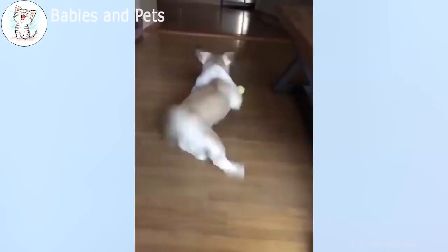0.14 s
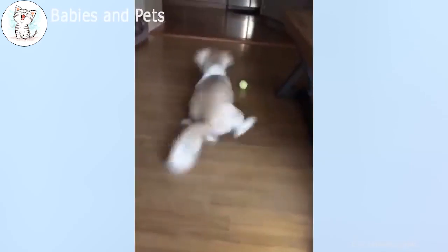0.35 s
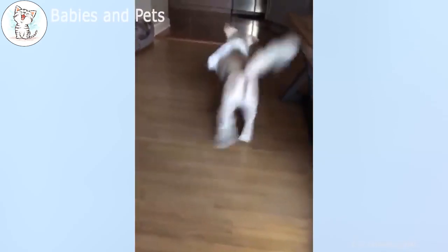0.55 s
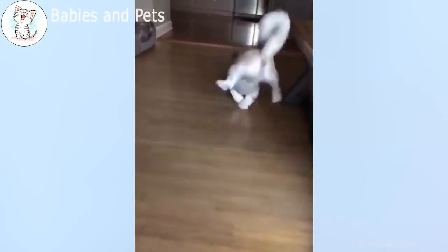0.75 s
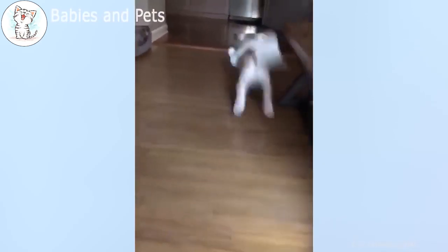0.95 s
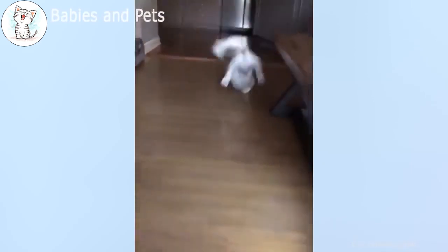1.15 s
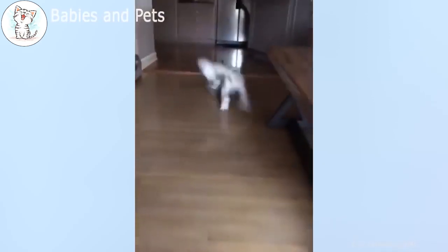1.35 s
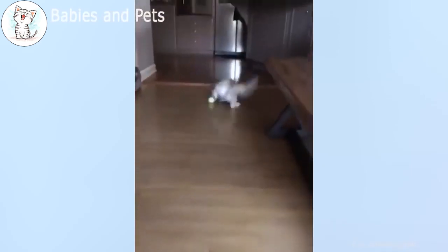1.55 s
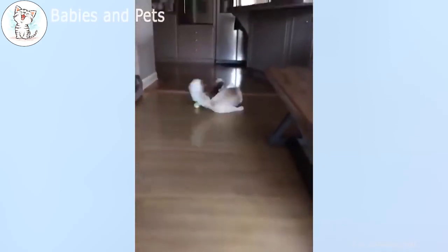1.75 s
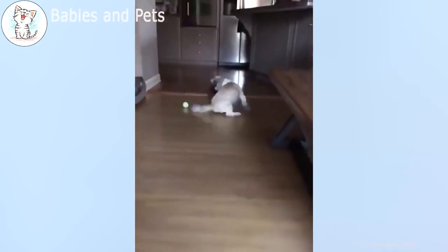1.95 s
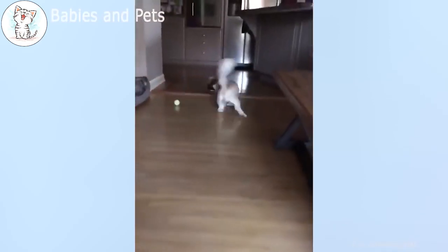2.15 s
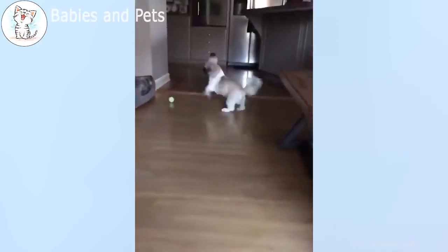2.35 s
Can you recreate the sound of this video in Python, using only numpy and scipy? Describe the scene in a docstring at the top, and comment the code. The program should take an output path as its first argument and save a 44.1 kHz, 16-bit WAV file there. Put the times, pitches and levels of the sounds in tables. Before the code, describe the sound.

Dog claws scrambling over hardwood indoors, sharp ticks and scrapes mixed with deep body thumps

```python
"""A room with a wooden floor: a small dog scrambles after a ball, rolls over and gets up again.
Its claws click and scrape: bursts of tiny slips, coloured by the wood and two rings each.
Paws and body thud, and hard knocks travel through the boards as bending waves, treble first.
Both leave floor modes ringing. The room answers more strongly as the dog runs away.
Low rumble and faint hiss, made of shaped noise, lie beneath."""
import sys
import numpy as np
from scipy import signal
from scipy.fft import rfft, irfft
from scipy.io import wavfile
from scipy.ndimage import uniform_filter1d

SR = 44100
rng = np.random.default_rng(int(sys.argv[2]) if len(sys.argv) > 2 else 0)


def master_out(mix):
    """Clip the mix to full scale and print it as 16-bit PCM to the path in sys.argv[1]."""
    frames = np.transpose(np.atleast_2d(mix))
    ceiling = np.clip(frames, -1, 1)
    pcm = np.round(ceiling * 32767).astype(np.int16)
    wavfile.write(sys.argv[1], SR, pcm)


N = 105840

# Steady background spectrum, relative: freq_hz, density_db
AIR_SPECTRUM = [(36, -21), (48, 17.5), (57, -6), (70, 7.5), (110, -13.5), (200, -21.5), (1500, -21),
                (4000, -25), (8000, -34.5), (13000, -43)]
# Room decay: freq_hz, t60_s
ROOM_T60 = [(80, 1.13), (170, 0.49), (4000, 0.5), (8000, 0.5169), (13000, 0.41)]
# Room colour: freq_hz, gain_db
ROOM_COLOUR = [(40, -25), (100, -2), (300, 2.5), (700, 3.5), (1500, 1), (3000, 0), (6000, -1.5),
               (13000, -4)]
# Floor modes, relative levels: freq_hz, level_db, t60_s
FLOOR_MODES = [(50.42, 5.5, 1.47), (69.7, 8, 1.3), (88.3, -3, 1.7), (103.1, -6.5, 0.76), (279, -7.5, 0.2),
               (316.3, -2.5, 0.62), (425, 1, 0.24), (463, -16, 0.33), (667, 8, 0.28), (717, -10, 0.37),
               (1136, -13, 0.95), (1200, -38, 0.78)]
# Soft thuds of paws and body: start_s, level_db, centre_hz, skirt_db_per_octave, room_db, floor_ring_db
THUDS = [(-.04, -34, 83, 9, 3, 7.5), (.224, -39.5, 197, 17, 2.5, 0), (.757, -23, 290, 13, -2, -29),
         (1.023, -33, 84, 11, -5, 5), (1.14, -21, 80, 15, -3.5, -7.5), (1.39, -32, 135, 3, 2, -4),
         (1.422, -25, 151, 10.5, -5.5, -11), (1.529, -22.5, 144, 29.5, -1.5, -1.5),
         (1.558, -23, 157, 19, -6.5, -29), (1.727, -32, 95, 8, -5, -20), (1.777, -24, 102, 6.5, 1.5, -1.5),
         (1.798, -25.5, 99, 9.5, -4, 6), (1.821, -20, 54, 16, -18, -8), (1.853, -30, 90, 9.5, 1, -4),
         (1.881, -22, 57, 15, 0, -11), (2.226, -35.5, 118, 26, 4, -18)]
# Hard knocks: start_s, level_db, tilt_db_per_octave, ring_hz, travel_s (1 kHz bending wave),
# tail_db (room and floor ring alike)
KNOCKS = [(0.1122, -35, 3.5, 520, 0.0039, -20), (0.218, -26.5, 5, 830, 0.003005, -8),
          (0.3613, -10, -0.4, 208, 0.003, -10), (0.6896, -4, 1.7, 450, 0.0048, -9),
          (1.779, -31, 0, 604, 0.00535, 0), (1.914, -28, -1, 620, 0.0044, -0.5),
          (2.164, -31.5, 0, 560, 0.0037, 1.5)]
# Knock spectrum, relative: freq_hz, level_db
KNOCK_SPECTRUM = [(25, -16), (50, 1.5), (80, 6.5), (140, -4.5), (300, -11), (440, -13), (570, -19),
                  (730, -12.5), (900, -18), (1200, -10.5), (1700, -21), (2250, -46), (5000, -56),
                  (12000, -52)]
# Claw strikes: start_s, level_db, ring_hz, second_ring_hz, tilt_db_per_octave, scrape_s, room_db
CLAWS = [(-.04, -23.5, 5540, 3030, 1, .002, 5), (.0796, -27, 4720, 9100, -0.5, 0.0016, -5),
         (0.114, -31, 6440, 4660, 0, 0.002, -17), (0.2182, -15.5, 5670, 11200, 1.3, 0.0045, -5),
         (0.363, -33.5, 3100, 4300, -2, 0.0012, -11), (0.4285, -30, 5770, 1500, -7, 0.00052, 0),
         (0.4537, -23.5, 4370, 2570, -0.5, 0.00063, -3.5), (0.4734, -25, 3700, 2380, -2.5, 0.00083, -11),
         (0.498, -31, 4620, 3290, -3, 0.0004, -21), (0.5202, -26, 4420, 11500, -0.5, 0.0005, -18),
         (0.53, -21.5, 2940, 5650, -1, 0.0038, -2.5), (0.6211, -21, 4250, 1720, -1.5, 0.006, -3),
         (0.664, -26, 1620, 5470, -6.5, 0.0021, -17), (0.6668, -23, 5470, 5960, -2, 0.0052, 1),
         (0.6757, -22, 8700, 6300, 11, .002, -2.5), (0.6897, -11.5, 6070, 2730, -3, 0.0045, -6.5),
         (0.721, -24.5, 3340, 2320, -3, 0.021, -6), (0.83, -24, 6750, 5720, 3, 0.0053, -4),
         (0.866, -28, 4400, 7140, 0.5, 0.002, -6.5), (0.996, -17.5, 4120, 1980, -1.5, 0.0057, -10),
         (1.0265, -33, 4040, 2620, 0, .002, 13.5), (1.043, -19, 4610, 5640, 1, 0.0012, -6.5),
         (1.1075, -27.5, 3030, 6910, -1.5, 0.0055, -6), (1.1427, -11.5, 4200, 10100, -1.2, 0.0023, -5),
         (1.246, -29, 5940, 4560, 3, 0.01, -12), (1.394, -18.5, 3960, 6700, 4, 0.0023, 0),
         (1.426, -20.5, 2070, 5140, 1.04, 0.0024, 2), (1.534, -16, 2420, 5020, -1, 0.0032, -3),
         (1.549, -19.5, 4280, 2580, -0.5, 0.0067, -1), (1.637, -28, 5210, 6950, -1, 0.002, 0.5),
         (1.676, -32, 2990, 4000, 1.5, 0.0027, 6), (1.737, -25, 3370, 6690, 0, 0.0059, 2.5),
         (1.8545, -30.5, 4350, 9100, 1, 0.0023, -0.5), (1.901, -37.5, 4530, 7350, -0.5, 0.00084, 7.5),
         (1.912, -43, 3010, 4100, 0.5, 0.0037, 15), (2.213, -31, 2880, 4200, 1.5, 0.0043, 8),
         (2.2578, -26.5, 4470, 3100, -.5, 0.0017, 0)]
# Claw on wood, spectrum, relative: freq_hz, level_db
CLAW_SPECTRUM = [(400, -13.5), (800, -12), (1300, -5), (2500, -0.5), (6500, -1.5), (8000, -4),
                 (10000, -5.5), (12500, -6), (14000, -22)]

SIZE = 32768  # samples per blow
HZ = np.fft.rfftfreq(SIZE, 1 / SR) + 1
T_S = np.arange(SIZE) / SR
BLOW_GAIN = np.sqrt(SR / 100)  # blow levels are rms over 10 ms

AIR_DB = -39.5
ROOM_BUILD_S, ROOM_GRAIN_DB = 0.0086, 4.5
EDGE_ECHO_S, EDGE_ECHO_DB, EDGE_ECHO_HZ = 0.02144, -4, 220  # return from the edge of the floor
THUD_TRAVEL_S = 0.004637  # at 1 kHz; lower notes come later
THUD_WIDTH_OCTAVES = 0.13
PAD_HZ = 330  # a soft paw passes little above this
RING_DB, SECOND_RING_DB, KNOCK_RING_DB = 9, 6, 7
RING_OCTAVES = 0.09
CLAW_SWELL = 0.2  # swell time as a share of scrape_s
GRAIN_DB = -2  # spread of slip sizes
CHATTER_DB, CHATTER_RATIO = -11, 4  # energy against the strike before the swell; length against scrape_s
REFLECTION_DB = -5
ROOM_RING_SHARE = 0.5  # the room hears the claw from all sides, which evens out its rings
LOW_CUT_HZ, EDGE_HZ = 47, 13200
CEILING = 0.9  # overload limit, full scale = 1


def amp(db):
    """Decibels to gain."""
    return np.exp(np.asarray(db) * (np.log(10) / 20))


def unit(x):
    """Scales to an energy of one."""
    return x / np.sqrt(np.sum(x ** 2) + 1e-20)


def read(points, hz):
    """Interpolates a table on a log-frequency axis."""
    f, value = np.transpose(points)
    return np.interp(np.log(hz + 1), np.log(f), value)


def add(mix, start_s, sound):
    """Mixes a sound in at start_s, trimming what falls outside."""
    at = round(start_s * SR)
    sound = sound[max(-at, 0):]
    part = mix[max(at, 0):][:len(sound)]
    part += sound[:len(part)]


def causal(db):
    """Minimum-phase response with this level curve: rings only after the blow."""
    cepstrum = irfft(np.log(amp(np.maximum(db, -100))))
    cepstrum[1:SIZE // 2] *= 2
    cepstrum[SIZE // 2 + 1:] = 0
    return np.exp(rfft(cepstrum))


def resonance(hz, peak_db):
    """Level curve of one narrow resonance."""
    return peak_db / (1 + (np.log2(HZ / hz) / RING_OCTAVES) ** 2)


def air():
    """Low rumble and faint hiss of the room: shaped steady noise."""
    gain = amp(read(AIR_SPECTRUM, np.fft.rfftfreq(N, 1 / SR)))
    noise = irfft(rfft(rng.standard_normal(N)) * gain, N)
    return amp(AIR_DB) * np.sqrt(N) * unit(noise)


def room(db):
    """Reverberation of a blow: uneven reflections build up, then each band dies at its own speed."""
    gain = amp(db) / np.sqrt(np.mean(amp(db) ** 2))
    signs, sizes = rng.standard_normal((2, SIZE))
    taps = np.sqrt(SIZE) * unit(signs * amp(ROOM_GRAIN_DB * sizes))
    noise = irfft(rfft(taps) * gain * amp(read(ROOM_COLOUR, HZ)))
    hz, t_s, bands = signal.stft(noise, SR, nperseg=512)
    decay = amp(-60 * t_s / read(ROOM_T60, hz)[:, None])
    tail = signal.istft(bands * decay, SR)[1][:SIZE]
    build = 1 - np.exp(-(T_S / ROOM_BUILD_S) ** 2)
    envelope_1khz = build * amp(-60 * T_S / read(ROOM_T60, 1000))
    return tail * build / np.linalg.norm(envelope_1khz)


def boards(db, level_db, travel_s, room_db, ring_db):
    """A blow spreads through the floor as a falling chirp, returns once and leaves its modes ringing."""
    bend = np.exp(-4j * np.pi * travel_s * np.sqrt(1000 * HZ))  # delay goes as 1 / sqrt(hz)
    echo = amp(EDGE_ECHO_DB) * np.exp(-2j * np.pi * HZ * EDGE_ECHO_S)
    echo = echo / (1 + (HZ / EDGE_ECHO_HZ) ** 2)
    fade = 1 - (T_S / T_S[-1]) ** 2
    wave = unit(fade * irfft(causal(db - db.max()) * bend * (1 + echo)))
    drive = np.sqrt(amp(db - db.max()))
    ring = np.zeros(SIZE)
    for hz, mode_db, t60_s in FLOOR_MODES:
        since_arrival_s = np.maximum(T_S - travel_s * np.sqrt(1000 / hz), 0)
        decay = np.exp(-np.log(1000) * T_S / t60_s)
        ring += np.interp(hz, HZ, drive) * amp(mode_db) * decay * np.sin(2 * np.pi * hz * since_arrival_s)
    floor_ring = amp(ring_db) * unit(fade * ring)
    return BLOW_GAIN * amp(level_db) * (wave + floor_ring + amp(room_db) * room(db))


def thud(level_db, centre_hz, skirt_db, room_db, ring_db):
    """A padded blow: only a hump of bass."""
    hump_db = -skirt_db * np.hypot(np.log2(HZ / centre_hz), THUD_WIDTH_OCTAVES)
    padding_db = 10 * np.log10(1 + (HZ / PAD_HZ) ** 4)
    return boards(hump_db - padding_db, level_db, THUD_TRAVEL_S, room_db, ring_db)


def knock(level_db, tilt_db, ring_hz, travel_s, tail_db):
    """A hard blow reaching well into the midrange; the struck spot adds its own short ring."""
    db = read(KNOCK_SPECTRUM, HZ) + tilt_db * np.log2(HZ) + resonance(ring_hz, KNOCK_RING_DB)
    return boards(db, level_db, travel_s, tail_db, tail_db)


def claw(level_db, ring_hz, second_hz, tilt_db, scrape_s, room_db):
    """A swelling burst of slips on wood rings, chatters, reflects off the nearby floor, excites the room."""
    db = read(CLAW_SPECTRUM, HZ) + tilt_db * np.log2(np.maximum(HZ, 500) / 4000)
    rings_db = resonance(ring_hz, RING_DB) + resonance(second_hz, SECOND_RING_DB)
    signs, sizes = rng.standard_normal((2, SIZE))
    swell = 1 - np.exp(-(T_S / (CLAW_SWELL * scrape_s)) ** 2)
    strike = unit(np.exp(-T_S / scrape_s))
    chatter = amp(CHATTER_DB) * unit(np.exp(-T_S / (CHATTER_RATIO * scrape_s)))
    force = swell * np.hypot(strike, chatter)
    slips = rfft(signs * amp(GRAIN_DB * sizes) * force)
    # the wood sets the broad colour, the slips the detail
    uneven_db = 10 * np.log10(uniform_filter1d(abs(slips) ** 2, size=1500))
    reflection_s = rng.uniform(0.0005, 0.0016)  # delay of one early reflection
    reflection = 1 + amp(REFLECTION_DB) * np.exp(-2j * np.pi * HZ * reflection_s)
    click = unit(irfft(slips * reflection * causal(db + rings_db - uneven_db)))
    reverb = amp(room_db) * room(db + ROOM_RING_SHARE * rings_db)
    return BLOW_GAIN * amp(level_db) * (click + reverb)


def scene():
    """All blows over the background."""
    mix = air()
    for source, table in ((thud, THUDS), (knock, KNOCKS), (claw, CLAWS)):
        for start_s, *settings in table:
            add(mix, start_s, source(*settings))
    return mix[None]


def record(dry):
    """The microphone drops the deepest bass and overloads on the loudest peaks; then the band limit."""
    hz = np.fft.rfftfreq(2 * N, 1 / SR) + 1
    low_cut = np.sqrt(1 + (LOW_CUT_HZ / hz) ** 10)
    cut = irfft(rfft(dry, 2 * N) / low_cut)[:, :N]
    held = cut / (1 + (cut / CEILING) ** 6) ** (1 / 6)
    band_limit = signal.firwin(201, EDGE_HZ, window=("kaiser", 8), fs=SR)
    return signal.oaconvolve(held, band_limit[None], "same")


dry = scene()
out = record(dry)
master_out(out)
```